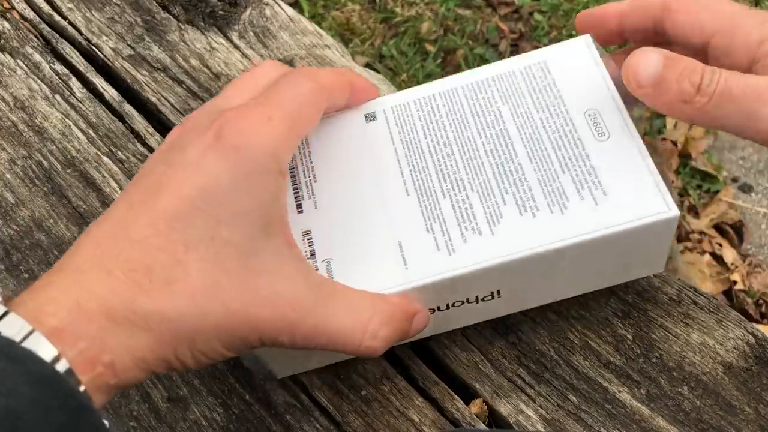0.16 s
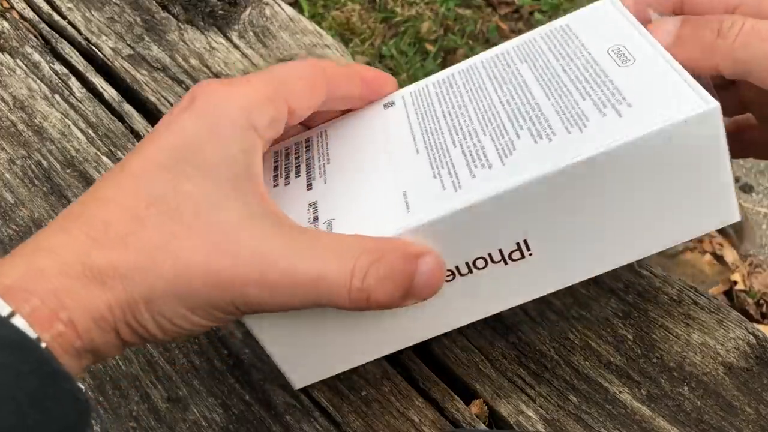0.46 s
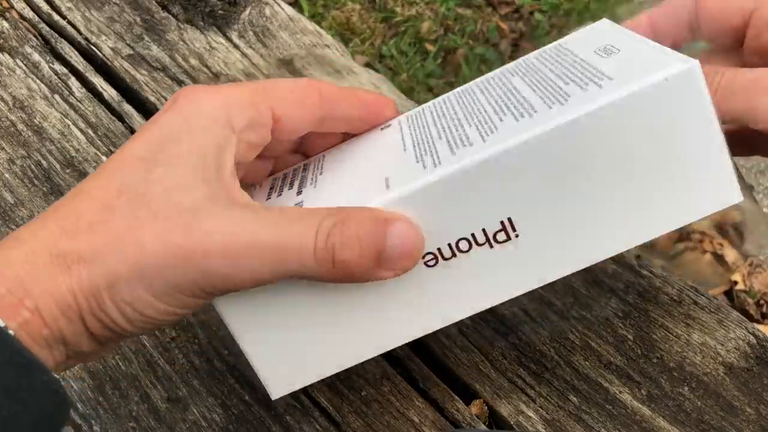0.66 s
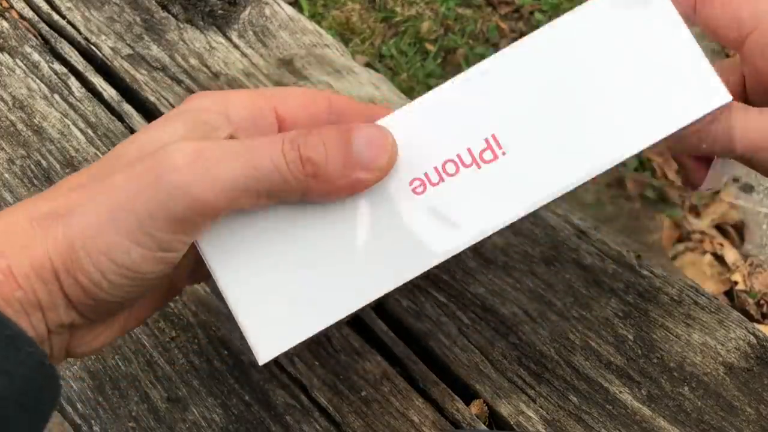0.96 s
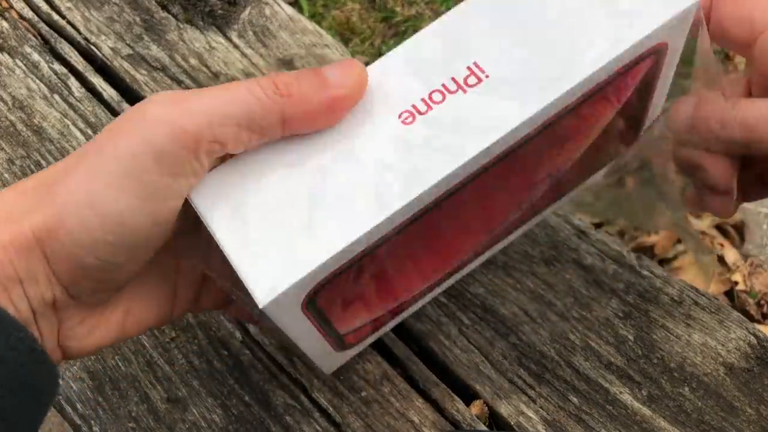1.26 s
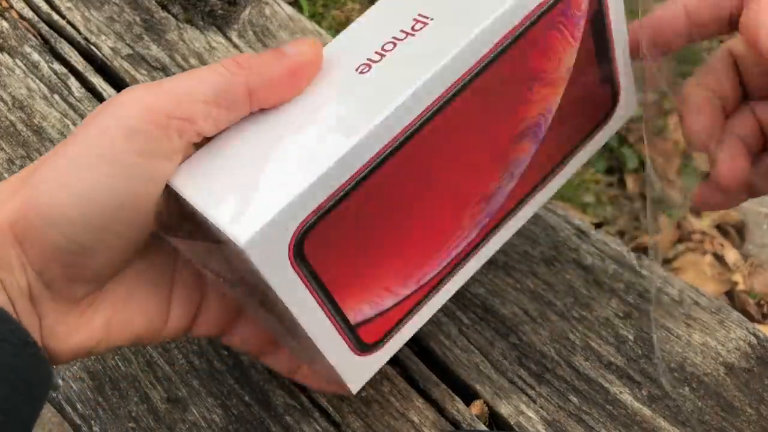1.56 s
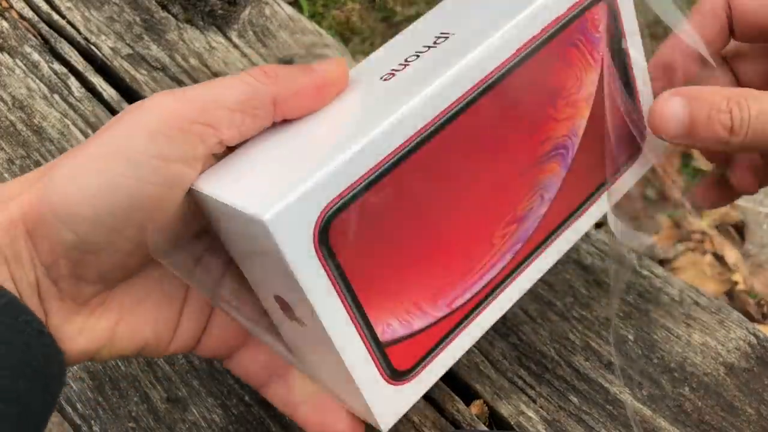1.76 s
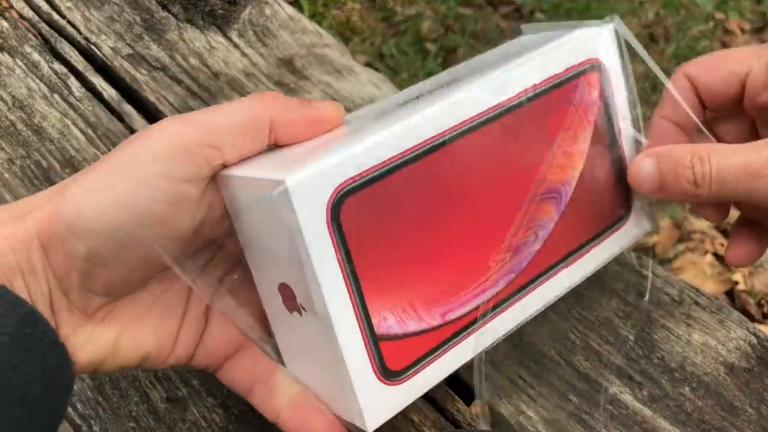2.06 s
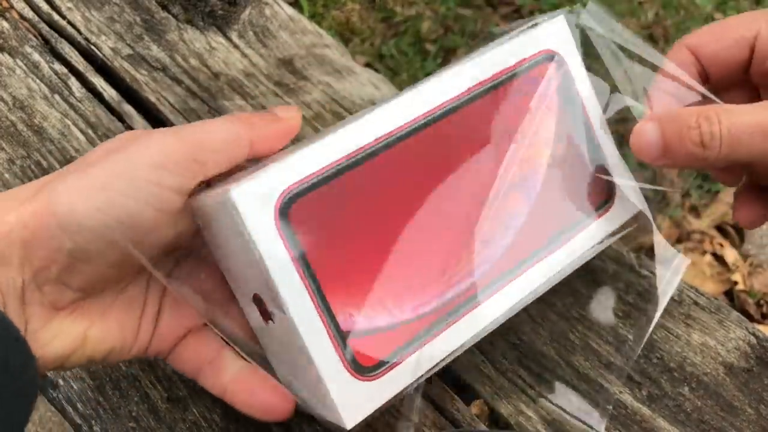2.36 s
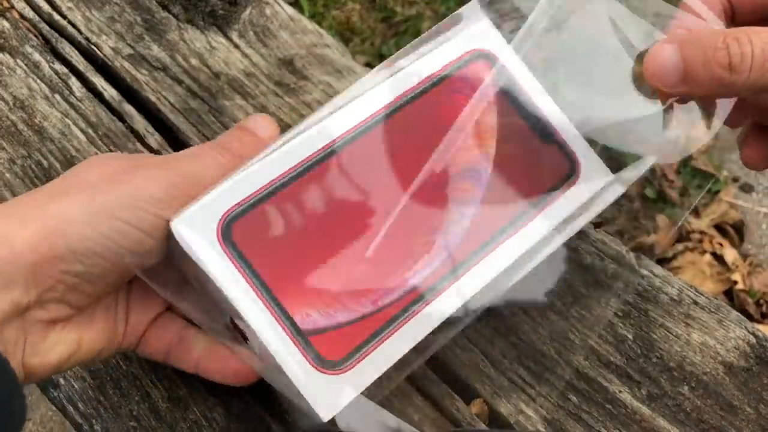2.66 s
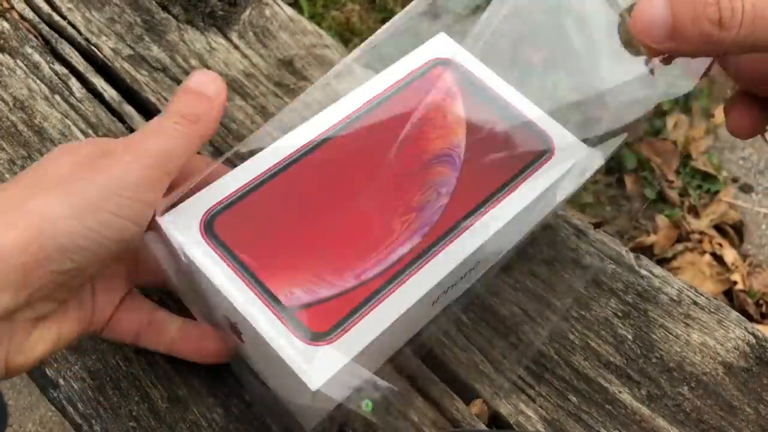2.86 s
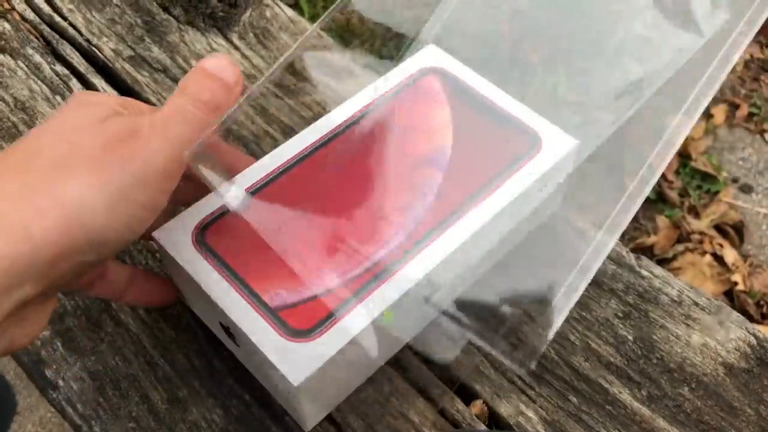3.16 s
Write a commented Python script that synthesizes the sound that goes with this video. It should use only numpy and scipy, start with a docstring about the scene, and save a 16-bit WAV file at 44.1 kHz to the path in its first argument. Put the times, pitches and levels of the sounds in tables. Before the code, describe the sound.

Plastic wrap crinkles and snaps as it is torn off a box, ending with a knock.

```python
"""Unwrapping a box outdoors.

Hands tear plastic wrap off a cardboard box, close by. Creases flip and snap; the film rips,
rustles as it slides and pops against the box. The box knocks a few times, then scrapes on a plank.
A small bird whistles faintly at the start and near the end, over a distant low rumble."""
import sys
import numpy as np
from scipy import signal
from scipy.fft import rfft, irfft
from scipy.io import wavfile
from scipy.ndimage import uniform_filter1d

SR = 44100
rng = np.random.default_rng(int(sys.argv[2]) if len(sys.argv) > 2 else 0)


def master(y):
    """Save y as 16-bit WAV."""
    cut = np.clip(np.atleast_2d(y).T, -1, 1)
    pcm = np.round(cut * 32767)  # scale
    wavfile.write(sys.argv[1], SR, pcm.astype(np.int16))


N = 145530

# Flipping creases: start_s, peak_db, ring_hz, treble_db, bass_db, decay_s
CREASE_SNAPS = [(0.0388, -43, 4850, -9, -19, 0.0016), (0.087, -30, 1900, -28, -9, 0.0022),
                (0.178, -37.5, 4390, -14, -3, 0.003), (0.386, -28.5, 2140, 3, 20, 0.0022),
                (0.4509, -31, 2900, -17, -7, 0.0025), (0.4664, -14, 3540, -8, 2, 0.00058),
                (0.59, -44, 3300, -16, -16, 0.0015), (0.642, -14, 4570, -5, -28, 0.0012),
                (0.718, -33, 4200, -12, -4, 0.0024), (0.737, -16, 6260, -13, -21, 0.0024),
                (0.845, -33.5, 2580, -15, 4, 0.002), (0.867, -35, 3350, -20, 9, 0.0015),
                (0.9087, -24.5, 1830, -23, -24, 0.0004), (0.945, -41, 1240, -24, -16, 0.0015),
                (0.9896, -32, 4870, -18, -5, 0.0019), (1.0192, -18, 1470, -13, -1, 0.0016),
                (1.181, -40, 9000, -6, -30, 0.00083), (0.981, -44.5, 1500, -25, -6, 0.0012),
                (1.3348, -24.5, 3550, -5, 1, 0.0036), (1.381, -36, 3350, -13, -16, 0.0024),
                (1.405, -30.5, 4380, -8, -8, 0.0022), (1.4459, -15.5, 1470, -11, -14.5, 0.0021),
                (1.5331, -10.5, 5460, -25, -27, 0.0012), (1.569, -4, 5600, -5.5, -12, 0.0022),
                (1.5754, -20, 5000, -14, 4, 0.0026), (1.6333, -27, 2070, -15, -20, 0.0033),
                (1.694, -17, 1230, 1.5, -10, 0.0034), (1.7, -25.5, 1490, -30, 0, 0.0021),
                (1.7534, -18.5, 3930, -8, -12, 0.0034), (1.862, -32.5, 1930, -34, 3, 0.0019),
                (1.8975, -30.5, 6070, -6, -11, 0.0016), (1.9234, -24, 4940, -24, -4, 0.00092),
                (1.939, -24.5, 6200, -7, -29, 0.0013), (1.956, -24.5, 2280, -0.5, -20, 0.001),
                (1.9935, -32, 2260, -20, -16, 0.0013), (2.0342, -16, 3160, -40, -8, 0.0016),
                (2.0423, -17, 2260, -26, -1, 0.0017), (2.072, -21.5, 3400, -21, -1, 0.00088),
                (2.1338, -5, 4950, 3, -4, 0.0019), (2.2861, -12, 2010, -4.5, -14, 0.001),
                (2.2945, -28, 6090, 2, -25, 0.0008), (2.369, -22.5, 4050, -31, -1, 0.0015),
                (2.422, -14.5, 2970, -20, -19, 0.0015), (2.466, -32, 9000, -3, -25, 0.00082),
                (2.5, -24.5, 5130, -24, -23, 0.0011), (2.508, -19.5, 3300, -39, -6.5, 0.0013),
                (2.58, -35, 3500, -19, -9, 0.0015), (2.625, -33, 3000, -9, -31.5, 0.0021),
                (2.6342, -18, 2170, -32, -1, 0.0025), (2.68, -31, 1490, -40, -2, 0.0026),
                (2.7005, -30, 1690, -16, 8, 0.002), (2.727, -26, 2980, -9, -7, 0.004),
                (2.7438, -22, 2760, -11, 1, 0.0017), (2.801, -28, 3330, -11, -5, 0.003),
                (2.9193, -7.5, 3240, -3.5, -4, 0.0013), (2.9668, -5, 3900, -9.5, -13.5, 0.0023),
                (3.034, -7, 4630, -5.5, -9, 0.0017), (3.2132, -22, 1340, -26, 27, 0.0074),
                (3.2217, -23, 1300, -16, 17, 0.0018), (3.2835, -26.5, 5340, -7, 2, 0.0026),
                (3.2885, -15.5, 2920, -9, 1, 0.0023)]
# Short tears: start_s, length_s, peak_db, ring_hz, treble_db, bass_db
FILM_RIPS = [(0.4595, 0.0113, -16, 3700, -1, -5.5), (0.726, 0.007, -29, 4400, 0, -20),
             (0.738, 0.0098, -15.5, 4880, -8, -14.5), (0.744, 0.026, -30, 4000, -9, -1),
             (2.03, .013, -30.5, 2680, -23, -10), (2.611, 0.021, -28, 2830, -16, -16),
             (2.64, 0.01, -28, 2280, -12, -2), (1.492, 0.017, -28, 4900, -2, -9),
             (1.509, 0.016, -29.5, 4500, -10, -8), (2.995, 0.0089, -17, 4500, 1, -26)]
# Film resonances: centre_hz, width_hz, gain_db
FILM_MODES = [(3398, 396, 3.5), (4390, 313, -5), (5340, 540, -4), (6120, 350, -3.5), (1580, 190, -12)]
# Sliding film, band envelopes: time_s, mid_db, treble_db, low_db
RUSTLE_LEVELS = [(0, -54.5, -65, -61.5), (0.06, -66, -78, -66.5), (0.075, -50, -52.5, -52),
                 (0.11, -55, -61, -70), (0.165, -58, -72, -74), (0.176, -53.5, -49, -53),
                 (0.2, -54.5, -58, -67), (0.24, -58.5, -65.5, -69.5), (0.3, -50, -54.5, -51.5),
                 (0.39, -47.5, -57, -58), (0.405, -62, -71, -68), (0.44, -52, -57.5, -48.5),
                 (0.49, -50.5, -58, -52), (0.55, -57, -60, -71), (0.575, -69, -72, -68),
                 (0.61, -47.5, -55, -55.5), (0.66, -50, -56, -64), (0.7, -45.5, -48.5, -64.5),
                 (0.769, -46, -55, -48), (0.83, -48.5, -56, -66), (0.89, -54.5, -66, -61),
                 (0.96, -59, -68, -66), (1.015, -55, -65, -56.5), (1.045, -70, -78, -67),
                 (1.075, -65, -72, -63), (1.095, -61.5, -77, -68), (1.15, -54, -67, -63.5),
                 (1.24, -55, -67, -60), (1.28, -48.5, -57, -61.5), (1.31, -49.5, -59.5, -54.5),
                 (1.42, -53.5, -55.5, -60), (1.485, -49.5, -52.5, -58), (1.5, -44.5, -47, -54),
                 (1.55, -39, -46, -51), (1.59, -39.5, -45, -44), (1.63, -47.5, -52, -50),
                 (1.65, -59, -69, -50), (1.685, -69, -74, -78), (1.71, -53, -64, -53),
                 (1.79, -47, -55.5, -56.5), (1.825, -49.5, -60, -56), (1.84, -67, -88, -63),
                 (1.871, -48.5, -57, -56.5), (1.95, -46.5, -49.5, -53), (1.98, -48.5, -54, -59.5),
                 (2.05, -46.5, -56, -53.5), (2.1, -45.5, -60, -46.5), (2.148, -37, -41.5, -42.5),
                 (2.18, -51, -65, -53), (2.2, -56, -66, -57.5), (2.35, -52.5, -66, -54),
                 (2.39, -45.5, -56.5, -53.5), (2.48, -47, -49, -54.5), (2.52, -42.5, -50, -50.5),
                 (2.55, -49, -65, -51), (2.59, -45, -49.5, -52.5), (2.63, -44, -46, -45),
                 (2.655, -47.5, -60, -48), (2.69, -50.5, -55.5, -51.5), (2.759, -45.5, -52, -55.5),
                 (2.85, -52, -56.5, -55.5), (2.89, -45, -60, -55.5), (2.95, -44.5, -53, -54.5),
                 (2.985, -34, -45, -46), (3.005, -40, -44, -43), (3.015, -50, -57, -51),
                 (3.1, -58.5, -66, -63.5), (3.2, -51.5, -57, -53.5), (3.241, -63, -68, -65),
                 (3.27, -51.5, -59, -54), (3.3, -59, -69, -61)]
# Film resonance relative to raw slip noise: time_s, gain_db
RUSTLE_RINGING = [(0, -13), (.35, -2), (.62, -2.5), (1.15, -3.5), (1.5, -0.5), (1.8, -6), (2.1, -7.5),
                  (2.6, -4.5), (3.3, -12.5)]
# Slip spectrum: freq_hz, gain_db
SLIP_SPECTRUM = [(150, 20.5), (300, 3.5), (1000, 1), (2000, 0.5), (3500, -1), (6500, -3), (9000, -5.5),
                 (13000, -6), (16000, -14)]
# Film popping against the box: start_s, peak_db
FILM_POPS = [(0.47, -36.5), (0.746, -35.5), (1.571, -31.5), (1.6936, -24.5), (2.134, -46)]
# Blows on the box: start_s, peak_db (before the low cut), contact_s
BOX_KNOCKS = [(2.152, -26.5, 0.001), (2.158, -18.5, 0.0014), (3.2168, -13.5, 0.0003),
              (3.2214, -8.5, 0.0008), (3.2248, -10, 0.00073)]
# Box resonances: pitch_hz, gain_db, t60_s
BOX_MODES = [(128, 4, 0.11), (358, 10.5, 0.044), (423, 11, 0.053), (575, 21.5, 0.018), (692, 18.5, 0.047),
             (1330, -20, .025), (2030, -24, 0.014)]
# Box dragging on wood: time_s, level_db
SCRAPE_LEVELS = [(3.222, -68), (3.231, -34), (3.246, -37), (3.255, -35), (3.262, -45), (3.272, -38),
                 (3.284, -47), (3.3, -37)]
# Friction spectrum: freq_hz, gain_db
SCRAPE_SPECTRUM = [(40, -18), (120, 2.5), (350, -3), (750, -6), (1100, -28), (4000, -56)]
# Bird whistles: start_s, length_s, from_hz, to_hz, level_db
BIRD_WHISTLES = [(-.04, .135, 4300, 5020, -62), (3.135, .09, 7500, 7820, -67),
                 (3.262, .04, 6950, 7000, -67)]
# Outdoor background spectrum: freq_hz, gain_db
AIR_SPECTRUM = [(12, -55), (30, -12), (60, -1), (130, -2.5), (300, -11), (700, -17), (1500, -41),
                (3300, -20.5), (7000, -33.5), (16500, -33)]

LEAD_S = 0.002  # room for treble that arrives ahead of a burst


def snaps(rise_s=0.000275, click_gain=2.95, tail_db=-27, tail_t60_s=0.065):
    """A crease flips: one click over a fast-dying rattle with a faint tail."""
    out, t = np.zeros(N), np.arange(4096) / SR
    click = click_gain * (np.arange(len(t)) == round(rise_s * SR))
    for start_s, peak_db, ring_hz, treble_db, bass_db, decay_s in CREASE_SNAPS:
        tail = gain_of(tail_db - 60 * t / tail_t60_s)
        envelope = np.minimum(t / rise_s, 1) * (np.exp(-t / decay_s) + tail)
        drive = click + rng.standard_normal(len(t))
        add(out, start_s - LEAD_S, film_burst(drive, envelope, peak_db, ring_hz, treble_db, bass_db))
    return out


def rips():
    """The film tears: short noise bursts that swell and stop."""
    out, t = np.zeros(N), np.arange(4096) / SR
    for start_s, length_s, *voicing in FILM_RIPS:
        progress = np.minimum(t / length_s, 1)
        envelope = np.sin(np.pi * progress ** 1.54).clip(0) ** 0.93
        add(out, start_s - LEAD_S, film_burst(rng.standard_normal(len(t)), envelope, *voicing))
    return out


def film_burst(drive, envelope, peak_db, ring_hz, treble_db, bass_db,
               body_db=-6.5, modes_db=-6, low_cut_hz=660, spread_s=0.001398):
    """A burst rings the film. Treble dies first; low bending waves travel slower and arrive last."""
    hz = np.fft.rfftfreq(len(drive), 1 / SR) + 30
    colour = (bell(hz, ring_hz, 0.15) + gain_of(body_db) * bell(hz, 3400, 0.64)
              + gain_of(bass_db) * bell(hz, 900, 0.78))
    modes = sum(gain_of(modes_db + gain_db) * bell(hz, centre_hz, width_hz / centre_hz / 2)
                for centre_hz, width_hz, gain_db in FILM_MODES)
    body = rfft(drive * envelope) * colour * (1 + modes)
    treble = rfft(drive * envelope ** 1.92) * gain_of(treble_db) * bell(hz, 8800, 0.74)
    radiation = 1 / np.sqrt(1 + (low_cut_hz / hz) ** 4)
    lag_cycles = 2 * spread_s * (np.sqrt(1000 * hz) - hz / 3.5) + LEAD_S * hz
    burst = irfft((body + treble) * radiation * np.exp(-2j * np.pi * lag_cycles), len(drive))
    return at_peak(burst, peak_db)


def slips(rate_per_s=2500, uneven_db=2, t60_s=0.0035, flutter_db=1.46):
    """Dense tiny slips of uneven size, each a decaying puff of noise."""
    size_db = uneven_db * np.minimum(rng.exponential(1, N), 5)
    onsets = rng.random(N) < rate_per_s / SR
    power = signal.lfilter([1], [1, -gain_of(-120 / t60_s / SR)], gain_of(2 * size_db) * onsets)
    return np.sqrt(power) * rng.standard_normal(N) * gain_of(flutter_db * wander(samples=400))


def rustle(drift_db=4.5, patchy_db=2):
    """Slips excite the film's modes, which come and go as it bends. Three bands swell separately."""
    drive, rings = slips(), np.zeros(N)
    for centre_hz, width_hz, gain_db in FILM_MODES:
        ring = signal.lfilter(*signal.iirpeak(centre_hz, centre_hz / width_hz, SR), drive)
        rings += gain_of(gain_db + drift_db * wander(samples=2500)) * ring
    ring_gain = gain_curve(*np.transpose(RUSTLE_RINGING))
    blend = (unit_rms(drive) + ring_gain * unit_rms(rings)) / np.sqrt(1 + ring_gain ** 2)
    spectra = signal.stft(coloured(blend, SLIP_SPECTRUM), nperseg=256)[2]
    # Level varies in patches across frequency and time.
    patches = uniform_filter1d(rng.standard_normal(spectra.shape), size=6, axis=0)
    patches = unit_rms(uniform_filter1d(patches, size=10, axis=1))
    film = signal.istft(spectra * gain_of(patchy_db * patches), nperseg=256)[1][:N]
    time_s, *levels_db = np.transpose(RUSTLE_LEVELS)
    out = np.zeros(N)
    for level_db, band_hz in zip(levels_db, [(2000, 7500), (7500, 16500), (300, 2000)]):
        band = signal.sosfilt(signal.butter(3, band_hz, "band", fs=SR, output="sos"), film)
        out += gain_curve(time_s, level_db) * unit_rms(band)
    return out


def pops(centre_hz=366, lag_cycles=1.8):
    """Taut film pops against the box: a falling thump, each tone lag_cycles / hz seconds late."""
    out, hz = np.zeros(N), np.fft.rfftfreq(8192, 1 / SR) + 1
    pop = irfft(bell(hz, centre_hz, 1) * np.exp(-2j * np.pi * lag_cycles * np.log(hz)))[:3000]
    for start_s, peak_db in FILM_POPS:
        add(out, start_s, at_peak(pop, peak_db))
    return out


def knocks(low_cut_hz=187):
    """Soft blows ring the modes of the box; a low cut thins the bass."""
    out, t = np.zeros(N), np.arange(6000) / SR
    ring = sum(gain_of(gain_db - 60 * t / t60_s) * np.sin(2 * np.pi * pitch_hz * t)
               for pitch_hz, gain_db, t60_s in BOX_MODES)
    for start_s, peak_db, contact_s in BOX_KNOCKS:
        force = np.exp(-4 * (t[:300] / contact_s - 1) ** 2)
        add(out, start_s, at_peak(np.convolve(ring, force), peak_db))
    return signal.sosfilt(signal.butter(2, low_cut_hz, "high", fs=SR, output="sos"), out)


def scrape():
    """The box drags on a rough plank as it settles: low friction noise."""
    time_s, level_db = np.transpose(SCRAPE_LEVELS)
    sliding = np.arange(N) / SR > time_s[0]
    friction = unit_rms(coloured(rng.standard_normal(N), SCRAPE_SPECTRUM))
    return sliding * gain_curve(time_s, level_db) * friction


def bird():
    """Thin whistles: sine tones gliding upward."""
    out = np.zeros(N)
    for start_s, length_s, from_hz, to_hz, level_db in BIRD_WHISTLES:
        progress = np.arange(0, length_s, 1 / SR) / length_s
        pitch_hz = from_hz + (to_hz - from_hz) * progress
        envelope = gain_of(level_db) * np.sqrt(2 * np.sin(np.pi * progress))
        add(out, start_s, envelope * np.sin(2 * np.pi * np.cumsum(pitch_hz) / SR))
    return out


def air(level_db=-59, wobble_db=1.5):
    """Distant rumble and hiss, slightly uneven in level."""
    envelope = gain_of(level_db + wobble_db * wander(samples=2000))
    return envelope * unit_rms(coloured(rng.standard_normal(N), AIR_SPECTRUM))


def gain_of(db):
    """Decibels to amplitude gain."""
    return 10 ** (np.asarray(db) / 20)


def gain_curve(time_s, level_db):
    """Per-sample gain through dB breakpoints."""
    return gain_of(np.interp(np.arange(N) / SR, time_s, level_db))


def at_peak(x, peak_db):
    """Scales x to a peak level."""
    return gain_of(peak_db) * x / abs(x).max()


def unit_rms(x):
    """Scales x to rms 1."""
    return x / np.sqrt(np.mean(x ** 2) + 1e-20)


def bell(hz, centre_hz, log_width):
    """Gaussian on a log-frequency axis."""
    return np.exp(-0.5 * (np.log(hz / centre_hz) / log_width) ** 2)


def coloured(x, spectrum):
    """Filters x by a spectrum table."""
    freq_hz, gain_db = np.transpose(spectrum)
    hz = np.fft.rfftfreq(len(x), 1 / SR)
    return irfft(rfft(x) * gain_of(np.interp(np.log(hz + 1), np.log(freq_hz + 1), gain_db)), len(x))


def wander(samples):
    """Smoothed random wobble, rms 1."""
    return unit_rms(uniform_filter1d(uniform_filter1d(rng.standard_normal(N), samples), samples))


def add(mix, start_s, sound):
    """Mixes a sound in at start_s, trimmed to fit."""
    at = round(start_s * SR)
    sound = sound[max(-at, 0):]
    part = mix[max(at, 0):][:len(sound)]
    part += sound[:len(part)]


def scene():
    """Mono sum of all sources."""
    return (air() + rustle() + bird() + knocks() + snaps() + rips() + pops() + scrape())[None]


def record(dry):
    """Low-pass at 15.9 kHz."""
    low_pass = signal.firwin(255, 15900, window=("kaiser", 9), fs=SR)
    return signal.oaconvolve(dry, low_pass[None], "same")


dry = scene()
out = record(dry)
master(out)
```